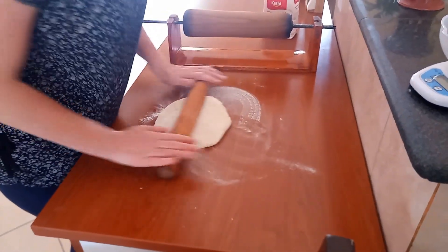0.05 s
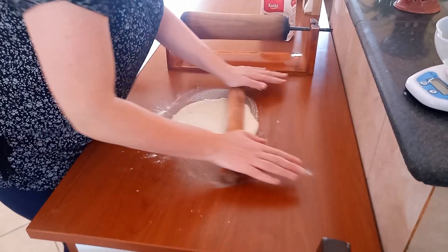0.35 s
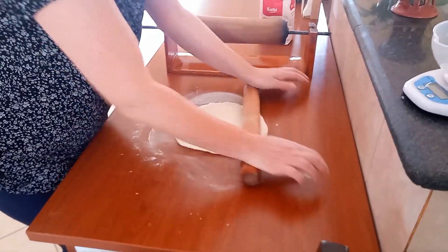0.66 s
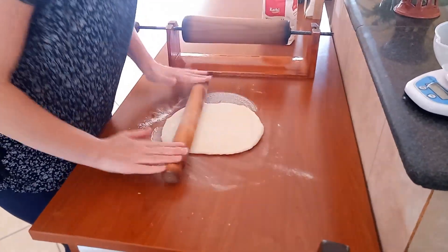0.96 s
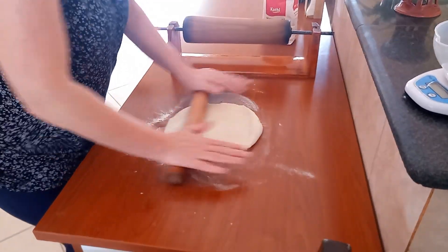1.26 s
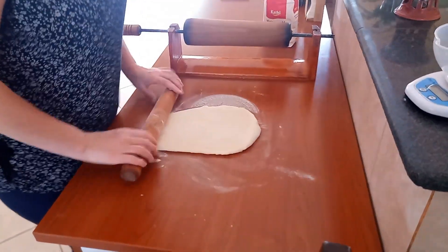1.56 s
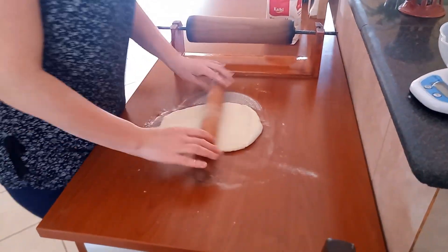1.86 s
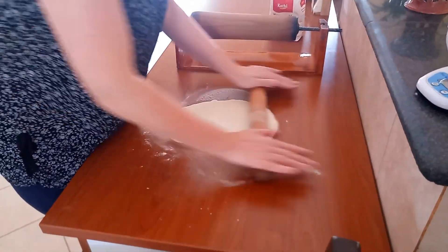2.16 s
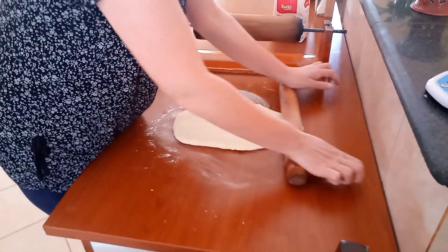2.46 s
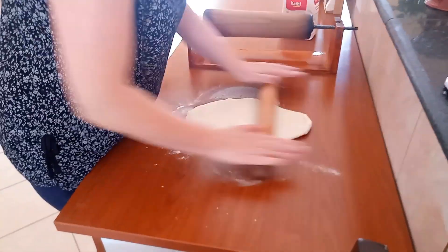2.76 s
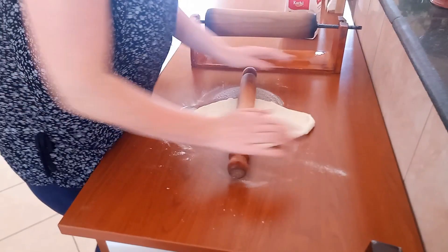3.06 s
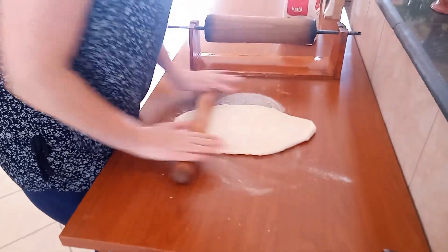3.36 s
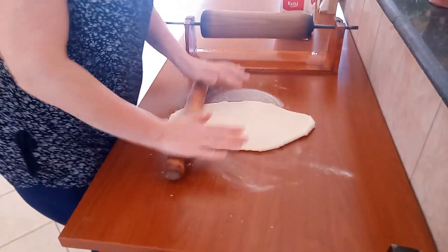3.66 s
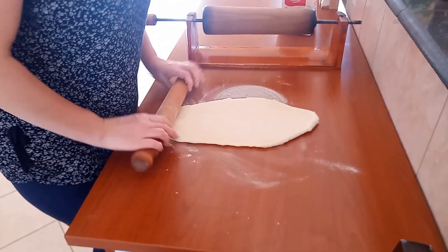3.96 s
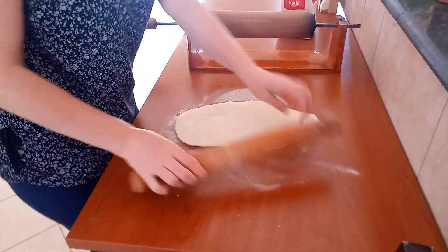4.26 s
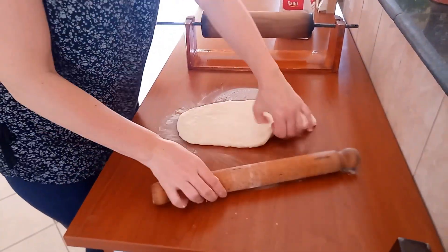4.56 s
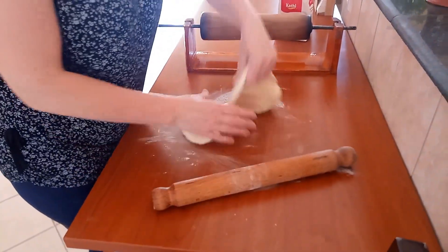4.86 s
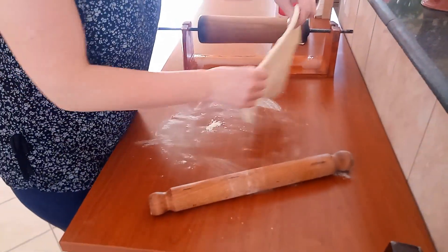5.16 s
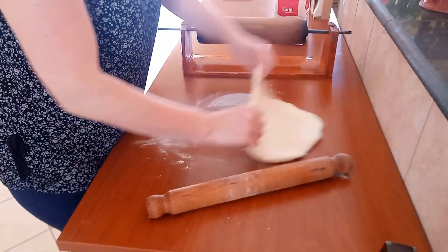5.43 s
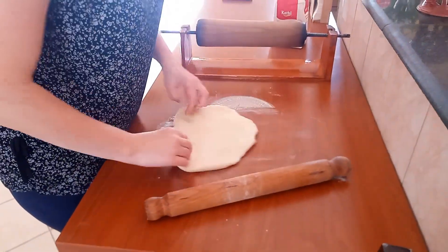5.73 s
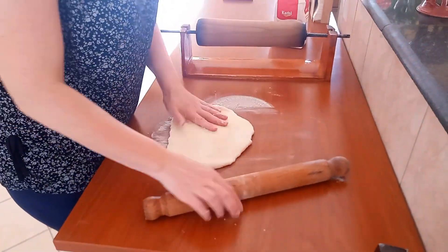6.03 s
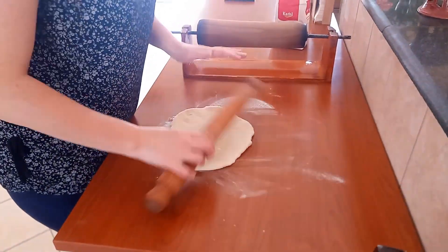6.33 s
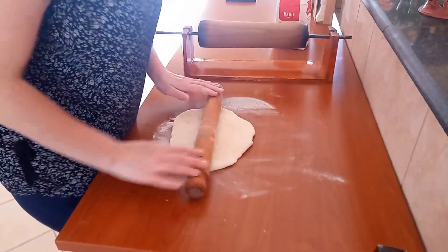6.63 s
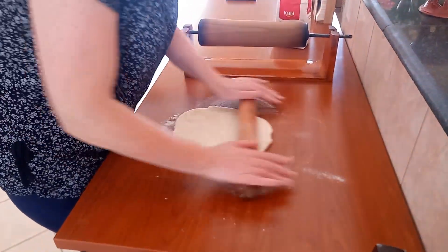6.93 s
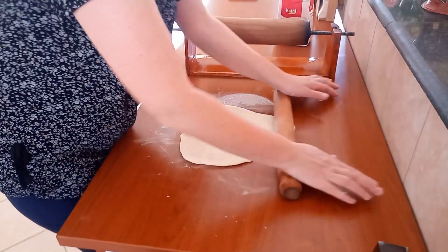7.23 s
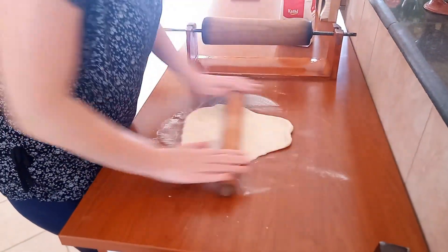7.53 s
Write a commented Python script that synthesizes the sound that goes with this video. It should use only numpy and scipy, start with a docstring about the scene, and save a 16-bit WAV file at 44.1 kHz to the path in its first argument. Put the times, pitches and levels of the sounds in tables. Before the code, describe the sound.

Close to a floured wooden table in a small, hard-walled kitchen, palms swish over a wooden rolling pin as it rumbles softly across dough, with tiny squeaks, dull thuds and irregular knocks on the tabletop. The pin is put down with a knock, the dough is turned over and hisses across the flour, and fingers smooth it. Then the rolling resumes. The walls ring briefly after each blow, over a quiet hiss.

```python
"""Close to a floured wooden table in a small, hard-walled kitchen, a wooden pin rolls out dough.
For the first four seconds palms swish over the turning pin, which rumbles, squeaks and knocks on the
top when it runs off the dough. At about 4.5 s the pin is put down; the dough is turned over, hissing
across the flour, and smoothed with the fingers. Near 6.7 s the rolling starts again.
The walls ring after every blow, and a quiet hiss lies under it all."""
import sys
import numpy as np
from scipy import signal
from scipy.fft import rfft, irfft, next_fast_len
from scipy.io import wavfile
from scipy.ndimage import uniform_filter1d

SR = 44100
rng = np.random.default_rng(int(sys.argv[2]) if len(sys.argv) > 2 else 0)


def dump_mix(stems):
    """Bounce the given channels to the path in sys.argv[1] as a 16-bit WAV at rate SR."""
    frames = np.atleast_2d(stems).T  # one column per channel
    limited = np.clip(frames, -1, 1)  # hard clip at full scale
    pcm = np.round(limited * 32767).astype(np.int16)
    wavfile.write(sys.argv[1], SR, pcm)


N = 334719
TIME = np.arange(N) / SR


def from_db(db):
    """Decibels to gain."""
    return 10 ** (np.asarray(db) / 20)


def unit_rms(x):
    """Scale to an rms of 1."""
    return x / np.sqrt(np.mean(x ** 2) + 1e-20)


def at_hz(points, hz):
    """Read a table on a log-frequency axis."""
    known_hz, values = np.transpose(points)
    return np.interp(np.log(np.maximum(hz, 1)), np.log(known_hz), values)


def coloured(x, colour):
    """Give a steady excitation a spectrum; rms 1."""
    size = next_fast_len(N)
    gain = from_db(at_hz(colour, np.fft.rfftfreq(size, 1 / SR)))
    return unit_rms(irfft(rfft(x, size) * gain, size)[:N])


def filtered(x, order, hz, kind):
    """Butterworth low, high or band pass."""
    return signal.sosfilt(signal.butter(order, hz, kind, fs=SR, output="sos"), x)


def drift(per_s):
    """Glide between random values, `per_s` of them a second; rms 1."""
    return unit_rms(np.interp(TIME * per_s, np.arange(N), rng.standard_normal(N)))


def grains(per_s, spread_db):
    """Tiny slips at random moments, a few much larger than the rest."""
    sizes = from_db(spread_db * np.minimum(rng.exponential(1, N), 5))
    return (rng.random(N) < per_s / SR) * sizes * rng.choice([-1, 1], N)


def swell(start, length):
    """A rounded rise and fall of height 1."""
    return np.sin(np.pi * np.clip((TIME - start) / length, 0, 1))


def swells(rows):
    """An envelope with one swell for each row."""
    return sum(from_db(db) * swell(start, length) for start, length, db in rows)


def resonate(force, modes):
    """Resonances in parallel; a blow starts them all in step."""
    out = np.zeros(N)
    for hz, width, db in modes:
        radius = np.exp(-np.pi * width / SR)
        poles = [1, -2 * radius * np.cos(2 * np.pi * hz / SR), radius ** 2]
        out += from_db(db) * (1 - radius ** 2) / 2 * signal.lfilter([1, 0, -1], poles, force + 1e-18)
    return out


# The kitchen with nothing moving. Each row: frequency in Hz, level in dB.
ROOM_TONE_COLOUR = [(25, -15), (80, 7), (250, 0), (600, -6), (1500, -12.5), (3100, -13.5), (3380, 0.5),
                    (3600, 5), (3880, -19.5), (7200, -10.5), (8500, -29), (13500, -30.5), (15500, -24)]

def room_tone():
    """A quiet, steady hiss with some low rumble, behind everything."""
    return from_db(-67) * coloured(rng.standard_normal(N), ROOM_TONE_COLOUR)


# The hard walls all round. Each row: frequency in Hz, seconds to die away by 60 dB.
KITCHEN_DECAY = [(60, 1), (200, 0.53), (500, 0.74), (1200, 0.92), (4000, 0.83), (12000, 0.2)]

def kitchen(x, gap_s, low_hz):
    """Dense wall reflections reach the microphone after a gap, each band dying at its own rate."""
    t, response = TIME[:SR], 0
    onset = np.clip(t / gap_s - 1, 0, 1)
    edges = np.geomspace(low_hz, 16000, 9)
    for low, high in zip(edges, edges[1:]):
        decay_s = at_hz(KITCHEN_DECAY, np.sqrt(low * high))
        band = filtered(rng.standard_normal(SR), 2, [low, high], "band")
        band *= from_db(-60 * t / decay_s) * onset
        response += band * np.sqrt(2 * (high - low) / SR / np.sum(band ** 2))   # unit gain in the band
    return signal.fftconvolve(x, response)[:N]


# The counter front and the wall, a step from the table. Each row: delay in seconds, level in dB.
NEAR_SURFACES = [(.0046, -10.5), (.0082, -10.5)]

def first_echoes(x):
    """Each nearby surface sends one weaker, delayed copy to the microphone."""
    return sum(from_db(db) * np.interp(TIME - delay, TIME, x, left=0) for delay, db in NEAR_SURFACES)


# Tacky dough leaving the pin. Each row: start in seconds, length in seconds, level in dB.
DOUGH_PEELS = [(1.043, 0.068, -61), (1.124, 0.21, -62.5), (1.31, 0.036, -56.5), (2.23, 0.018, -51),
               (6.214, 0.067, -70)]
# Its fizz from close by. Each row: frequency in Hz, level in dB.
PEEL_COLOUR = [(2000, -49), (6000, 11.5), (8500, 4.5), (11000, -1.5), (12500, -21), (15500, -10)]

def peels():
    """Threads of dough let go in a fine, bright fizz."""
    return swells(DOUGH_PEELS) * coloured(rng.standard_normal(N), PEEL_COLOUR)


# The pin skidding on bare wood. Each row: start in seconds, length in seconds, level in dB.
PIN_SKIDS = [(1.505, 0.14, -74), (3.768, 0.33, -70.5), (4.05, .1, -63), (5.94, 0.089, -70),
             (6.416, 0.13, -70)]
# Its thin singing. Each row: frequency in Hz, width in Hz, gain in dB for each pass of the filter.
SKID_MODES = [(2470, 120, 0), (4900, 300, -8)]

def skids():
    """Friction keeps a narrow resonance of the pin going, with a faint overtone."""
    ring = resonate(rng.standard_normal(N), SKID_MODES)
    narrowed = resonate(ring, SKID_MODES)
    return swells(PIN_SKIDS) * unit_rms(narrowed)


# Skin and grit on the wood, and the pin's far end touching down near 4.6 s. Each row: start in seconds, level
# in dB.
DRY_TICKS = [(.671, -56), (.698, -52), (1.347, -49), (1.616, -43.5), (1.81, -38), (2.233, -57), (2.41, -58),
             (3.641, -50.5), (4.122, -48), (4.517, -47), (4.604, -51), (5.948, -47.5), (6.216, -57),
             (6.814, -46)]
# Their snap from close by. Each row: frequency in Hz, level in dB.
TICK_COLOUR = [(500, -12.5), (1500, -1), (2000, -3), (2450, -18.5), (2900, -10), (3600, 11), (4500, -11),
               (6300, 9), (8000, -4), (10000, -24.5), (13000, -36.5), (15500, -23.5)]

def ticks(t60_s):
    """Each tick, and the crack of each knock of the pin, is a sharp burst that dies at once."""
    cracks = [(start, crack_db) for start, *_, crack_db in PIN_KNOCKS]
    envelope = np.zeros(N)
    for start, db in list(DRY_TICKS) + cracks:
        fall_db = 60 * np.clip((TIME - start) / t60_s, 0, 3)
        envelope += from_db(db - fall_db) * (TIME >= start)
    return envelope * coloured(rng.standard_normal(N), TICK_COLOUR)


# Skin slipping on the pin. Each row: start and length in seconds, first and last pitch in Hz, peak in dB.
SKIN_SQUEAKS = [(0.219, .014, 5620, 2180, -36), (.231, .015, 3854, 3145, -30.5),
                (.243, 0.011, 3470, 3100, -42), (3.320, .0014, 6600, 6100, -18),
                (7.078, .011, 10750, 9750, -37), (7.12, .006, 8040, 5700, -44.5),
                (7.141, 0.0075, 10500, 6570, -52.5)]

def squeaks(waver):
    """Stick-slip slows as the skin comes to rest, so every squeak falls in pitch."""
    out = np.zeros(N)
    wobble = 1 + waver * drift(per_s=2700)
    for start, length, first_hz, last_hz, db in SKIN_SQUEAKS:
        at, size = round(start * SR), round(length * SR)
        pitch_hz = np.geomspace(first_hz, last_hz, size) * wobble[at:at + size]
        phase = 2 * np.pi * np.cumsum(pitch_hz) / SR
        out[at:at + size] += from_db(db) * np.hanning(size) * np.sin(phase)
    return out


# Dough dragged across the table. Each row: start in seconds, seconds in motion, level in dB.
DOUGH_SLIDES = [(4.868, 0.07, -52.5), (5.09, 0.031, -58), (5.371, .33, -50)]
# Its hiss on the flour. Each row: frequency in Hz, level in dB.
SLIDE_COLOUR = [(410, -51), (700, -21), (818, -27), (968, -11), (1830, -14), (2870, -7.5), (3490, 2),
                (3970, -12), (6760, 0.5), (11200, -30), (13600, -33), (15500, -23)]

def slides(attack_s, release_s):
    """Soft dough glides evenly over the flour: the hiss builds, holds while it moves, and dies."""
    envelope = np.zeros(N)
    for start, length, db in DOUGH_SLIDES:
        rise = np.clip((TIME - start) / attack_s, 0, 1)
        fall = np.exp(-np.maximum(TIME - start - length, 0) / release_s)
        envelope += from_db(db) * rise * fall
    return envelope * coloured(grains(per_s=16000, spread_db=2.0), SLIDE_COLOUR)


# The wood in front of the microphone: table top, legs and frame, and the pin itself.
# Each row: frequency in Hz, width in Hz, level in dB.
TOP_RESONANCES = [(122.4, 35, -14), (161.6, 35, 4), (195.4, 8.1, -8), (210.4, 11, 1), (283.4, 42, 0),
                  (320.4, 27.3, 0), (402, 61, -4.5), (480, 8.7, -6.5), (530.3, 3, -10.5), (512, 67, 0),
                  (606, 22, -5), (735, 14, -7.5), (957, 19, -9.5)]
FRAME_RESONANCES = [(55, 3.8, -2), (68.25, 3.9, 2), (98, 36, -3)]
PIN_RESONANCES = [(1264, 89, -14), (1416, 81, -13), (1643, 75, -5.5), (2450, 100, 7.5)]

def wood(on_top, on_frame, on_pin=None):
    """Each wooden part rings in its own modes under the force it is given."""
    table = resonate(on_top, TOP_RESONANCES) + resonate(on_frame, FRAME_RESONANCES)
    return table if on_pin is None else table + resonate(on_pin, PIN_RESONANCES)


# The bare pin striking the table; the looser the grip, the more it rings.
# Each row: start in seconds, top level in dB, contact in ms, frame level in dB, lowest flexing of the
# top at that spot in Hz, pin ring in dB, seconds until the rebound, crack in dB.
PIN_KNOCKS = [(1.052, -14.5, 2.2, -5.5, 130, -11, .02, -57), (1.577, 19, 1.06, 24.5, 172, 25, .0102, -41.5),
              (1.83, 3, 0.84, -10, 290, 7, 0.045, -34), (2.64, 17.5, 3.5, -2, 147, 11, 0.0099, -59.5),
              (3.849, 12, 2.3, 11.5, 240, 11.5, .007, -47), (4.486, 25.5, 1.33, 14, 156, 24, .03, -43)]
# The pin dropping over an edge of the dough, or rocking on wood. Each row: start in seconds, level in dB.
PIN_BUMPS = [(0.105, 0.5), (1.28, 0), (2.207, 1), (2.333, 3), (2.385, -1.5), (3.322, 2.5), (4.366, -4),
             (4.66, 4.5), (5.382, 0), (7.162, 5)]
# Weight landing on the dough. Each row: start in seconds, frame level in dB, contact in ms.
DOUGH_THUDS = [(0.817, 8.5, 11.6), (1.161, 17.5, 13.3), (1.814, 36.5, 5.15), (3.135, 20, 13.4),
               (5.948, 16.5, 5.6), (6.467, 28.5, 10.3), (7.518, 14.5, 13.7)]

def contacts(loss_db=7.5, softening=1.55):
    """Knocks with a weaker, softer rebound, then bumps, then thuds that mostly shake the frame."""
    # Each contact: start in seconds, top in dB, contact in ms, frame in dB, lowest Hz, pin in dB.
    for start, top_db, contact_ms, frame_db, lowest_hz, pin_db, gap_s, _ in PIN_KNOCKS:
        yield start, top_db, contact_ms, frame_db, lowest_hz, pin_db
        yield (start + gap_s, top_db - loss_db, contact_ms * softening,
               frame_db - loss_db, lowest_hz, pin_db - loss_db)
    for start, db in PIN_BUMPS:
        yield start, db, 4.97, db - 8, 148, db
    for start, db, contact_ms in DOUGH_THUDS:
        yield start, db - 9, contact_ms, db, 97.3, db - 9


# Where bending waves in the table lag most. The row: frequency in Hz, width in Hz, gain in dB.
BENDING_LAG = [(420, 330, 0)]

def table_blows():
    """Bare wood gives a short blow that also rings the pin; dough cushions it to a thud in the frame."""
    forces, size = np.zeros((3, N + SR)), SR // 8
    for start, top_db, contact_ms, frame_db, lowest_hz, pin_db in contacts():
        push = filtered(signal.unit_impulse(size), 4, 1000 / contact_ms, "low")
        flex = filtered(push, 3, lowest_hz, "high")
        at = round(start * SR)
        forces[:, at:at + size] += [from_db(top_db) * flex, from_db(frame_db) * push,
                                    from_db(pin_db) * flex]
    struck = wood(*forces[:, :N])
    return struck - 2 * resonate(struck, BENDING_LAG)   # all-pass: slow bending waves spread the blow


# Passes of the pin under the palms, out and back across the table.
# Each row: start in seconds, length in seconds, fine swish in dB, broad rub of the flat hand in dB.
PIN_PASSES = [(-.2, 0.75, -55, -55.5), (0.676, 0.24, -54.5, -62), (1.174, 0.27, -55, -63),
              (1.471, 0.25, -63, -67.5), (1.701, 0.29, -66, -61.5), (1.954, 0.43, -61.5, -68),
              (2.599, 0.32, -60, -70.5), (3.12, 0.34, -53, -59.5), (3.6, 0.32, -64.5, -78),
              (3.847, 0.21, -62, -67.5), (3.99, .34, -66, -60), (6.677, 0.49, -60, -56),
              (7.363, .34, -58.5, -64)]
# Fingers lightly over pin or dough. Each row: start in seconds, length in seconds, level in dB.
FINGER_BRUSHES = [(4.46, 0.49, -67), (5.94, 0.16, -62.5), (6.213, 0.11, -62), (6.373, 0.16, -56.5),
                  (6.55, .08, -61.5), (7.089, 0.14, -61.5)]

def hand_effort(ease_s):
    """Gains of swish, rub and rumble: each pass speeds up and slows down; a light brush only swishes."""
    swish, rub, load = np.zeros((3, N))
    for start, length, swish_db, rub_db in PIN_PASSES:
        speed = swell(start, length)
        swish += from_db(swish_db) * speed ** 1.08
        rub += from_db(rub_db) * speed ** 1.6
        load += from_db(-68) * speed   # the arms lean on the pin alike in every pass
    swish += swells(FINGER_BRUSHES)
    return uniform_filter1d([swish, rub, load], round(ease_s * SR))   # arms change speed gradually


def shifting_contact(x, depth_db, per_s):
    """Skin and flour keep changing their contact, so each band of the friction wanders on its own."""
    size, centres = next_fast_len(N), np.geomspace(1000, 12000, 12)
    spectrum, hz = rfft(x, size), np.fft.rfftfreq(size, 1 / SR)
    out = np.zeros(N)
    for share in np.eye(len(centres)):
        band = irfft(spectrum * np.interp(hz, centres, share), size)[:N]
        out += band * from_db(depth_db * drift(per_s))
    return out


# Palms on the pin from close by: fine swish and broad rub. Each row: frequency in Hz, level in dB.
SWISH_COLOUR = [(600, -16.5), (1000, -15.5), (2100, -20), (2450, -7.5), (2900, -23), (3500, -5),
                (4400, -26.5), (5400, -5.5), (6400, 3), (7400, -3.5), (9000, -21), (11000, -39),
                (13500, -35.5), (15300, -28)]
RUB_COLOUR = [(500, -34.5), (1000, -13), (2000, -8), (2700, 0.5), (3150, 2.5), (3500, 12.5), (4200, -4),
              (5200, 1.5), (6500, -2.5), (8500, -12), (10500, -19.5), (13500, -42), (15300, -29)]

def rolling_pin(frame_db, cushion_hz, judder_db):
    """Floury skin slides on the pin in countless tiny slips; the pin rumbles through the dough."""
    swish_gain, rub_gain, load = hand_effort(ease_s=0.026)
    swish = swish_gain * coloured(grains(per_s=13000, spread_db=3.0), SWISH_COLOUR)
    rub = rub_gain * coloured(grains(per_s=6400, spread_db=3.0), RUB_COLOUR)
    cushioned = filtered(rng.standard_normal(N), 2, cushion_hz, "low")
    rumble = load * unit_rms(wood(cushioned, from_db(frame_db) * cushioned))
    judder = from_db(judder_db * drift(per_s=57))
    return shifting_contact((swish + rub) * judder + rumble, depth_db=4.0, per_s=18)


def scene():
    """One microphone by the table: hands and wood up close, the kitchen ringing behind them."""
    blows = table_blows()
    small_sounds = ticks(t60_s=0.035) + peels() + slides(attack_s=0.065, release_s=0.025)
    small_sounds += squeaks(waver=0.04) + skids()
    rolling = rolling_pin(frame_db=7.5, cushion_hz=228.3, judder_db=1.63)
    to_walls = from_db(-2.5) * blows + from_db(-14) * small_sounds + from_db(-13) * rolling
    walls = first_echoes(blows) + kitchen(to_walls, gap_s=0.0029, low_hz=127)
    return (room_tone() + walls + small_sounds + blows + rolling)[None]


def record(dry):
    """The microphone loses the deepest bass; the highest treble is cut steeply."""
    thinned = filtered(dry, 8, 48, "high")
    treble_cut = signal.ellip(12, 0.1, 80, 15800, fs=SR, output="sos")
    return signal.sosfilt(treble_cut, thinned)


dry = scene()
out = record(dry)
dump_mix(out)
```